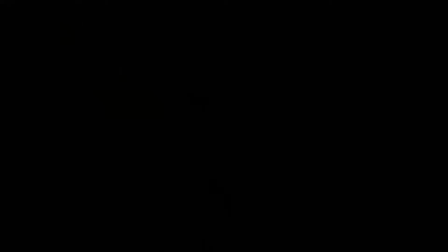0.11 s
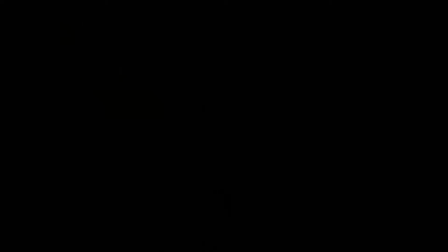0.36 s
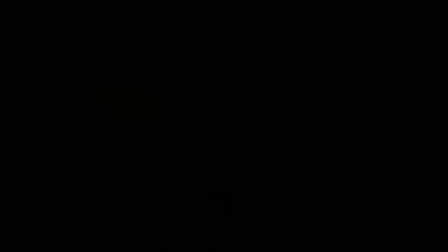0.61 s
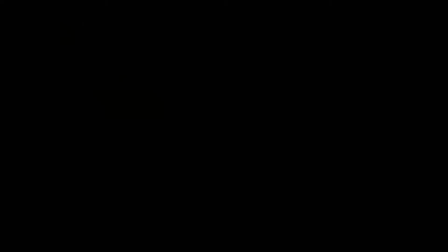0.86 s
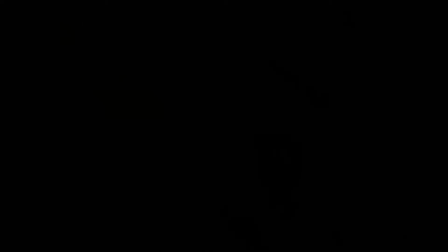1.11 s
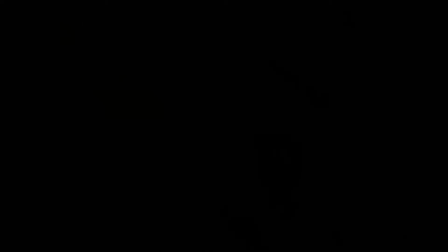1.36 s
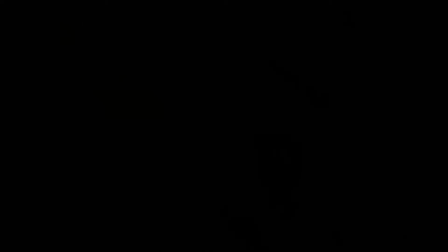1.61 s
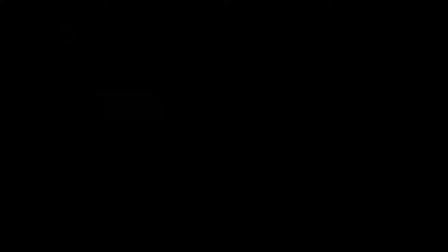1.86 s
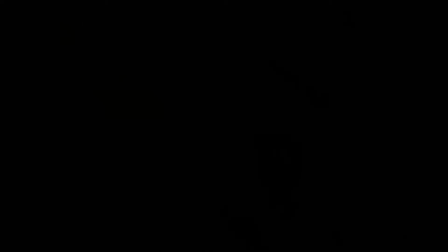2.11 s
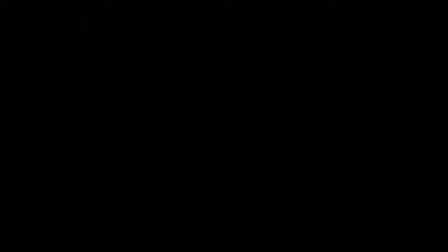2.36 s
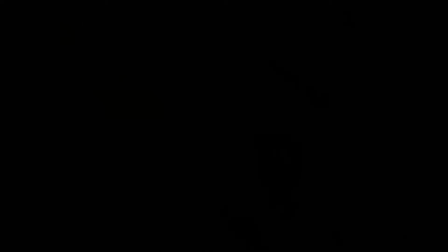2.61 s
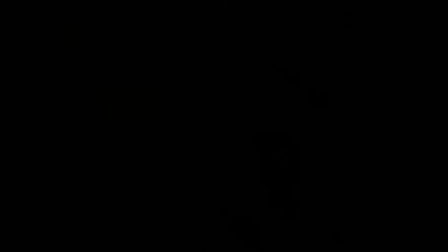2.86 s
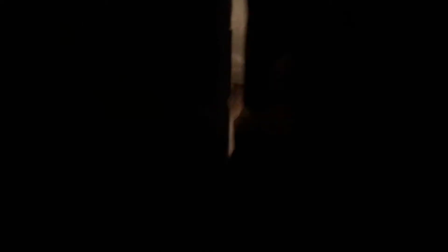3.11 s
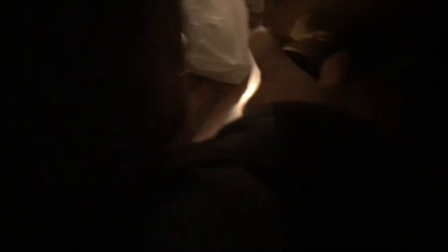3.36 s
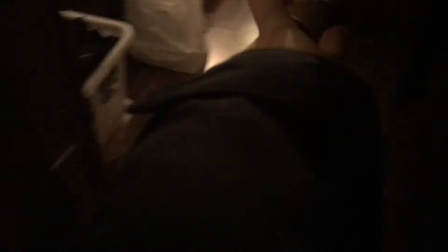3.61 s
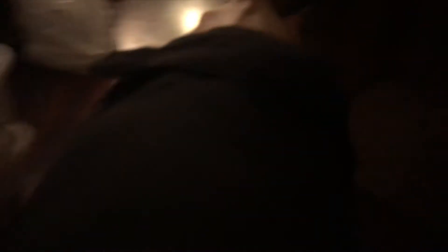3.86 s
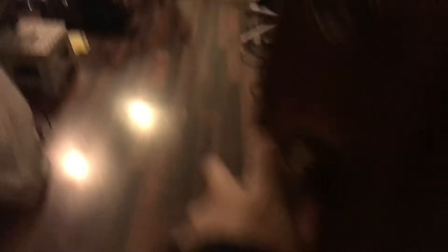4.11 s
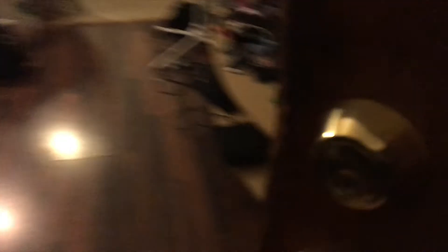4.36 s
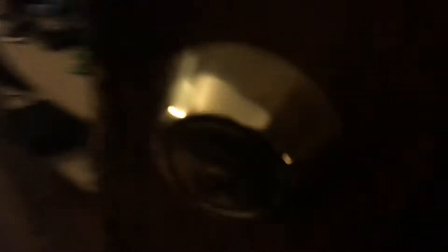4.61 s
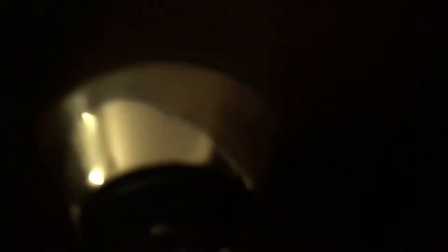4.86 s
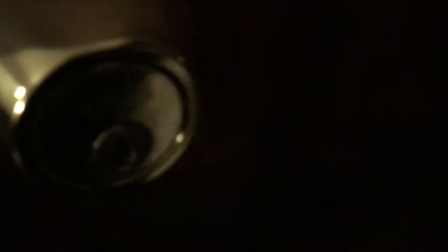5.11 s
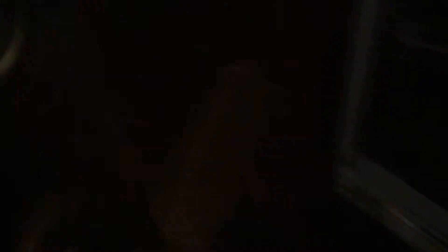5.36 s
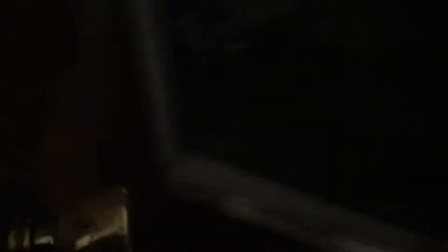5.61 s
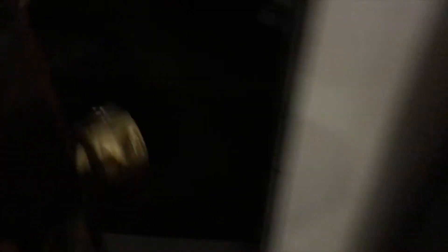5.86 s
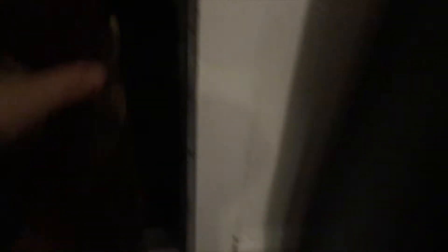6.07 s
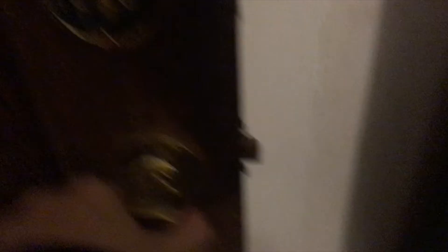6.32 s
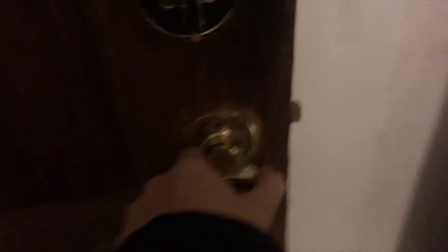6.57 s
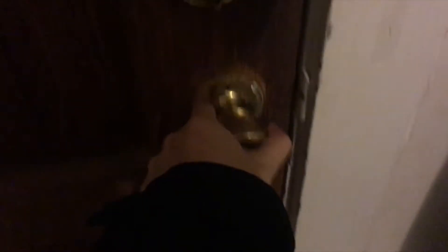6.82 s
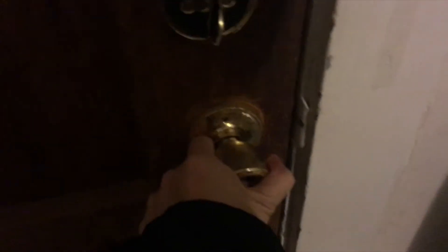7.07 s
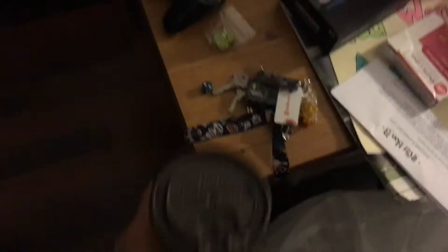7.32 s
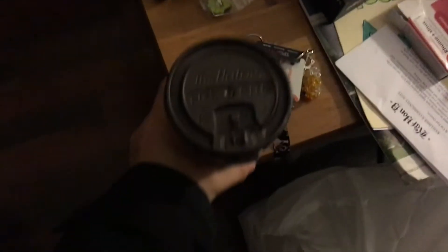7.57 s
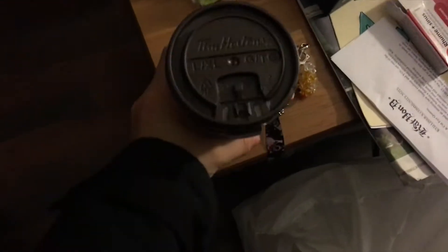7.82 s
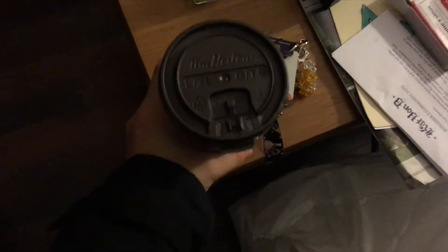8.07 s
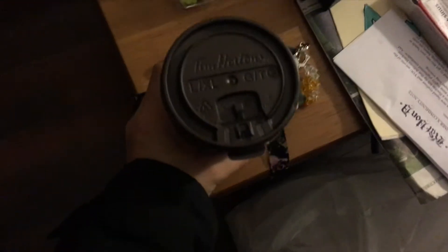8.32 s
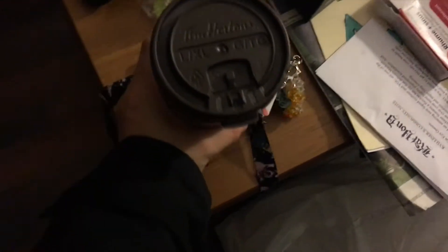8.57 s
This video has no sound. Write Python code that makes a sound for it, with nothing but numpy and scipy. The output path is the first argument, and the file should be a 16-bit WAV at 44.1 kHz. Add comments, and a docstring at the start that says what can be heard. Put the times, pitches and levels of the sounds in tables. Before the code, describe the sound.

Very close to a handheld microphone, keys jingle brightly and a lock snaps and rattles. A wooden door is knocked and opened with deep thuds, clacks and short metal squeaks, among cloth rub and bumpy handling rumble. After sparser clicks it slams with the loudest, booming thump in a short hall echo. The sound cuts to a nearly silent room with low hiss and hum, then tiny ticks and keys dragging grittily across a desk.

```python
"""Keys jingle, a lock clicks, a wooden door thumps and booms; then a jump to a quiet desk, where keys are dragged off.
A hand with a hand-held camera works the lock, opens the door, steps in and shuts it.
Clicks and thumps are bursts of noise and dying tones, keys are sets of ringing tones, squeaks are gliding noise.
Handling and the drag over the desk are grainy noise; a short hall echo, room hiss and a faint hum lie around them.
"""
import sys
import numpy as np
from scipy import signal
from scipy.fft import rfft, irfft, next_fast_len
from scipy.io import wavfile
from scipy.ndimage import uniform_filter1d

SR = 44100
rng = np.random.default_rng(int(sys.argv[2]) if len(sys.argv) > 2 else 0)


def gain_from_decibels(decibels):
    """Convert decibel values to linear amplitude factors."""
    exponent = np.asarray(decibels, float) / 20
    return 10 ** exponent


def dump(signal):
    """Clip the signal to [-1, 1] and save it as 16-bit WAV at the path in sys.argv[1]."""
    limited = np.clip(np.atleast_2d(signal).T, -1, 1)
    pcm = np.round(limited * 32767).astype(np.int16)
    wavfile.write(sys.argv[1], SR, pcm)


N = 383669  # length in samples

# Clicks of lock, latch and chain at the door, then four small clicks at the desk. Each row: start in seconds,
# nominal level in dB, wood below 1.2 kHz and fizz at the top, both in dB relative to the click,
# pitch of the part that is hit in Hz.
CLICK_EVENTS = [(0.0386, -33.5, -49, 7, 14000), (0.1087, -21, -29, -25, 9200), (0.176, -33, -23, -1, 15000),
                (0.2113, -26.5, -34, 11.5, 14700), (0.242, -29, -29, 17, 15300),
                (0.2648, -15.5, -26, 9, 14000), (0.2939, -13, -27, 8, 9400), (0.3185, -21.5, -25, -5, 5500),
                (0.387, -27.5, -12, -29, 1590), (0.4281, -26, -31, -9, 7140), (0.4435, -17, -18, 7.5, 5400),
                (0.558, -37, -13, -11, 1660), (0.5973, -26, -9, -6, 1630), (0.6265, -33.5, -21, 0, 1640),
                (0.6736, -39, -20, 6, 1640), (0.6903, -30.5, -17, -31, 1690), (0.7193, -38, -11, 3, 1720),
                (0.8651, -16, -10.5, -1.5, 1630), (0.978, -25, -16, 0, 3460),
                (0.9983, -25.5, -8, -18, 8900), (1.0504, -26.5, -25, -35, 9100),
                (1.0953, -24, -4, -2, 2580), (1.1133, 0, -16.5, -27, 1650), (1.1445, -7, -36, -30, 5200),
                (1.27, -22.5, -34, -1, 1530), (1.297, -31, -26, -20, 1550), (1.3893, -20.5, -36, -1, 1740),
                (1.4137, -46, -35, -22, 13900), (1.4426, -31.5, -28, -20, 1590),
                (1.496, -28, -18, -14, 1730), (1.6505, -27.5, -29, -3, 2300), (1.704, -22, 0.5, -2, 1530),
                (1.7225, -17, -10, -1, 1580), (1.8316, -29.5, -21, 6, 1710), (1.921, -5, -14, -3.5, 2370),
                (1.9685, -14.5, -19, -4, 1700), (1.9962, -14.5, -14, 0, 1650), (2.0418, -7, -18, 3, 1700),
                (2.149, -29, -17, -17, 3900), (2.2174, -36, -5, 7, 1800), (2.2675, -36, -26, -12, 3840),
                (2.3253, -37, -21, -12, 7900), (2.387, -36, -38, -1, 11400), (2.4174, -30.5, -45, 7, 2500),
                (2.5128, -39, -2.5, -14, 11400), (2.5368, -35, -20, 6, 6860), (2.5496, -34.5, -26, 7, 3940),
                (2.587, -29, -37, 5, 11300), (2.6095, -40, -32, -2, 11300), (2.6437, -32, -31, -1, 6700),
                (2.6713, -18.5, -12.5, -5, 5550), (2.7496, -45, -11, -10, 6800),
                (2.7653, -22, -18, -1, 1560), (2.7826, -17.5, -12.5, -10, 1840),
                (2.834, 1.5, -10, -1.5, 4650), (2.8826, -17, -29, -4, 2930), (2.9049, -14, -12.5, 0, 3100),
                (2.9951, -28, -9, -11, 2230), (3.3852, -21.5, -12, -8, 2330), (3.4154, -30, -26, -29, 2480),
                (3.6172, -26, 0, -12, 1770), (3.7576, -17, -6.5, -0.5, 1560), (4.2033, -27, -24, -13, 5360),
                (4.6195, -26.5, -6, -14, 7000), (4.6569, -13, -9.5, -2.5, 3480),
                (4.7139, -19.5, -6.5, -10, 2160), (4.7283, -23, -6.5, 0, 3480), (4.826, -34, -24, 6, 3900),
                (4.9057, -41, -24, -9, 6600), (4.9701, -29.5, -47, 11, 14600), (5.012, -26, -24, 4, 2370),
                (5.0539, -19.5, -10, 3.5, 1580), (5.1033, -32, -5, 12, 2300), (5.231, -28, -11, -1, 1680),
                (5.251, -33.5, -16, 6.5, 2320), (5.3797, -35.5, -32, 14.5, 2340),
                (5.6334, -43, -22, 8, 1580), (5.77, -29.5, -30, -18, 11300), (5.8038, -36, -30, 8, 11200),
                (5.8636, -40, -23, 5, 14000), (5.8905, -31, -32, 4.5, 1770), (5.9863, -27, -1, -4, 1670),
                (6.0791, -20, -6, -23, 2730), (6.2868, -16, -13, -36, 2570), (6.4747, -16, -32, -30, 1730),
                (6.5793, -27, -37, 1, 5660), (6.6811, -19, -6, 6, 1540), (6.7027, -12.5, -25, -36, 3710),
                (6.7755, -18.5, -11, -29, 5850), (6.832, -34, -16, -20, 1580),
                (6.8434, -33, -15, -22, 2750), (6.8547, -2.5, -26, -35, 2820), (6.8601, -6, -7, 8.5, 1706),
                (8.0275, -39.5, -31, -2, 2200), (8.0552, -37, -19, 1, 3620),
                (8.0681, -36.5, -25, 10.5, 4030), (8.1998, -42, -17, -24, 2410)]
# Thumps on door and floor boards, then three faint ones at the desk. Each row: start in seconds,
# nominal level in dB, brightness in dB per octave.
THUMP_EVENTS = [(0.131, -24.5, 4), (1.108, -32, 6.5), (1.264, -36, 4), (1.743, -8, 2), (1.92, -17, 4.5),
                (2.11, -30, 0), (2.511, -34, 5), (2.829, -20, 0.5), (3.34, -25.5, 8), (3.426, -24.5, -13),
                (3.558, -29.5, -2), (3.597, -19, -13.5), (3.702, -25, -3), (3.735, -17.5, 5),
                (3.758, -21.5, 4), (3.911, -41, -6), (4.031, -30, 19), (4.106, -23, -6),
                (4.307, -21.5, 16.5), (4.406, -33, -9), (4.524, -37.5, -9.5), (4.656, -24.5, 7),
                (4.728, -24, 2), (5.008, -32, -11), (5.217, -27, 6), (5.776, -44.5, 1), (5.906, -40, -16),
                (5.99, -37.5, -1), (6.073, -27, 7.5), (6.301, -25, 7.5), (6.404, -34.5, -14),
                (6.703, -16, 4.5), (6.769, -21.5, -9.5), (6.871, 3.5, 5.5), (8.197, -37.5, -1),
                (8.222, -40, -7), (8.26, -31.5, 2.5)]
# Tones of the door panel, used for every thump. Each row: pitch in Hz, level in dB, time to fall by 60 dB
# in seconds before each blow's own factor.
DOOR_MODES = [(77.7, 7, 0.17), (111, -17, 0.15), (171.4, -5, 0.58), (279, 6, 0.21), (364.7, -4, 0.42),
              (618, -3, 0.11), (970, 4, 0.023)]
# Tones of five keys, a to e, one list for each. Each row: pitch in Hz, level in dB, time to fall by 60 dB
# in seconds before each blow's own factor.
KEY_MODES = [
    [(4474, -25, .15), (5728, -12, .12), (6900, -14, .1), (7903, -15, .15), (9938, -5, .12),
     (11500, -8, .1), (13950, 0, .09), (14920, -8, .12)],
    [(5609, 0, .2), (7101, -14, .07), (8863, -15, .45), (8967, -10, .18)],
    [(9620, -3, .12), (10820, -2, .09), (11620, -4, .12), (12150, -4, .1), (12440, -6, .25),
     (12770, -2, .1), (13040, -5, .15), (15400, -2, .1)],
    [(3640, 0, .13), (4813, -4, .15), (5700, -10, .17), (9100, -14, .1), (12440, -14, .12),
     (12760, -9, .11)],
    [(4215, -14, .1), (6090, -14, .12), (6745, -6, .13), (9015, -18, .1), (10195, -6, .1), (11330, 0, .09),
     (14570, -4, .15)],
]
# Blows that set a key ringing. Each row: start in seconds, key a to e, level in dB before the flutter,
# brightness in dB per octave, factor on the ring time.
KEY_BLOWS = [(.0368, "a", -18, 22, .83), (.1136, "a", -29, -4.5, .8), (.1396, "a", -23, -10.5, .68),
             (.2099, "a", -12.5, 27, .37), (.2409, "b", -26, 6, .39), (.2409, "c", -15, -7, .7),
             (.2648, "a", -39, 4, .8), (.2824, "a", -18.5, -6, .4), (.4289, "a", -22, -14.5, .5),
             (.4344, "b", -26, 16, .43), (.9974, "b", -34.5, 15.5, .84), (.9986, "c", -32, -3, .9),
             (1.1443, "b", -18, -8.5, .89), (1.1697, "c", -24.5, 0, .72), (2.2807, "e", -39.5, -1, .7),
             (2.3855, "e", -37, 3, .38), (2.4179, "e", -31, 3, .3), (2.5137, "e", -36.5, -7, .45),
             (2.588, "e", -32.5, -19, .26), (2.6115, "e", -34.5, -6, .9), (2.6713, "e", -31, -5.5, .76),
             (4.6199, "b", -36, -3, .34), (4.708, "e", -38, 14, 1.5), (4.6568, "d", -23, -3, .75),
             (4.7287, "d", -24, -8, .65), (4.8733, "e", -40.5, -2, .76), (4.9686, "e", -24, 3, .99),
             (5.012, "e", -25, -5, 0.27), (5.0539, "e", -29, 0, 0.43), (5.7698, "e", -31.5, -13.5, .31),
             (5.8042, "e", -31, 10, .42), (6.2871, "b", -32, 17, .69), (6.2871, "c", -12.5, 4, 0.42),
             (6.2876, "d", -39, 37, 1.), (6.4747, "d", -56, -7.5, 1.)]
# Metal slipping on metal. Each row: start in seconds, length in seconds, first pitch in Hz, last pitch in Hz,
# width of each of two resonances in Hz, level in dB.
METAL_SQUEAKS = [(.9, .03, 9500, 9800, 80, -42), (1.378, .016, 14500, 14000, 900, -32),
                 (1.395, .012, 14200, 14000, 700, -30), (1.41, .02, 14200, 14000, 800, -29),
                 (2.882, .012, 11800, 12100, 300, -36), (2.9, .017, 2700, 3500, 200, -22),
                 (3.17, .05, 12600, 11500, 90, -56), (3.215, .035, 11600, 10900, 90, -46),
                 (3.21, .035, 9800, 9550, 90, -52), (3.18, .15, 1400, 1350, 90, -55),
                 (3.18, .15, 1950, 1860, 80, -53), (3.18, .16, 2420, 2370, 90, -55),
                 (3.37, .07, 1250, 1230, 70, -48), (6.77, .014, 6000, 6300, 300, -33),
                 (6.9, .45, 3250, 3250, 1.5, -65)]
# Hand, sleeve and steps at the door. Each row: time in seconds, rumble in dB, rub in dB, scrape in dB.
HANDLING_CURVE = [(0.0, -51, -55.5, -63), (0.34, -62, -57, -43.5), (0.68, -51, -70.5, -72),
                  (0.92, -57, -47, -56), (1.04, -59, -56.5, -53.5), (1.58, -53, -46, -53),
                  (1.78, -52, -57, -45.5), (1.92, -54, -57, -67), (2.06, -36, -49, -46),
                  (2.26, -47, -61, -57), (2.54, -63.5, -69.5, -57.5), (2.84, -48, -47.5, -47),
                  (3.04, -49.5, -54.5, -53.5), (3.4, -63, -50, -53), (3.6, -32, -55, -62),
                  (3.8, -66, -56, -56), (4.1, -50, -60, -59), (4.24, -58.5, -52, -56),
                  (4.69, -42, -50, -54.5), (5.04, -56.5, -56.5, -50.5), (5.51, -54.5, -62, -62.5),
                  (5.95, -40, -64, -57.5), (6.21, -54, -53.5, -53.5), (6.57, -49.5, -58, -63),
                  (6.73, -45, -58, -60), (6.87, -40, -48, -63), (7.03, -37.5, -56.5, -68.5),
                  (7.19, -50, -59, -66.5)]
# Tone colour of the cloth rub. Each row: frequency in Hz, relative level in dB per Hz.
RUB_COLOUR = [(70, -36), (130, 2.5), (340, -1.5), (650, -8), (1000, -6.5), (2200, -15.5), (5000, -31),
              (16000, -56)]
# Tone colour of the scrape. Each row: frequency in Hz, relative level in dB per Hz.
SCRAPE_COLOUR = [(590, -29.5), (1000, 0), (1420, -5.5), (1910, -4.5), (3300, -10.5), (5830, -13.5),
                 (10700, -18.5), (14400, -20.5), (16000, -16)]
# Resonances of desk top and keys under the drag. Each row: pitch in Hz, width in Hz, relative level in dB.
DRAG_RESONANCES = [(360, 206, 9.5), (1270, 65, 0.5), (1850, 69, 5), (3620, 120, -1.5), (4200, 96, -6.5),
                   (5920, 830, -2.5), (11300, 35, -22), (14000, 43, -17.5), (15000, 160, -34)]
# Strength of the drag over time. Each row: time in seconds, level in dB.
DRAG_CURVE = [(8.018, -55.5), (8.101, -71), (8.16, -61.5), (8.22, -64.5), (8.3, -54.5), (8.38, -47.5),
              (8.53, -43.5), (8.62, -45.5), (8.7, -48.5)]
# Tone colour of the room hiss. Each row: frequency in Hz, relative level in dB per Hz.
AIR_COLOUR = [(41, -46), (70, -1), (115, -21.5), (135, -8), (204, -13.5), (256, -5.5), (300, -12.5),
              (336, -6), (368, -15.5), (664, -12.5), (16000, -41.5)]
# How fast the echo dies away. Each row: frequency in Hz, time to fall by 60 dB in seconds.
HALL_DECAY = [(200, 0.29), (1000, 0.21), (4000, 0.1), (12000, 0.049)]
# Where the bands of scrape grains lie: a list of frequencies in Hz.
GRAIN_BANDS_HZ = [1300, 1900, 2700, 3900, 5600, 8000, 11500, 14500]
# The whole door leaf swinging at its lowest tone. Each row: start in seconds, nominal level in dB,
# time to fall by 60 dB in seconds.
DOOR_BOOMS = [(1.744, -21, 0.6), (1.923, -18.5, 1.06), (2.108, -38, 3.6), (2.84, -37, 0.65),
              (3.43, -36, 0.6), (3.518, -29, 0.3), (3.702, -25, 0.23), (4.063, -31, 0.55),
              (5.011, -41, 0.98), (6.401, -37, 0.53), (6.707, -26, 0.72), (6.872, -10.5, 0.4),
              (7.088, -28.5, 1.7)]

JUMP_S = 7.197  # the door ends and the desk begins
BOOM_HZ = 43.47
AIR_DB, HUM_HZ, HUM_DB = -60, 53, -62
CLICK_T60_S, CLICK_T60_DB_PER_DB = 0.021, -0.0275  # rattle of a -23.5 dB click; harder ones are a little shorter
PART_WIDTH = 0.085  # width of the part's ring as a share of its pitch
PART_DB, PART_DB_PER_DB = -21, 0.86  # gain of the part's ring for a -25.5 dB click; hard clicks drown it
THUMP_RING, THUMP_RING_DB_PER_DB = 0.42, -0.12  # ring factor of a -27.5 dB blow; hard blows ring shorter
TOUCHES_PER_S, TOUCH_SPREAD_DB = 4.7, 4.5  # rate for each key
TOUCH_RING, TOUCH_T60_S, TOUCH_DB = 0.12, 0.0055, -4  # ring factor, noise fall time, gain over the scrape curve
RUMBLE_BY_THUMP_DB, RUB_BY_THUMP_DB, RUB_BY_WOOD_DB, SCRAPE_BY_CLICK_DB = -19, -27, -23.5, -28.5
SHAKE_RISE_S, SHAKE_T60_S = 0.002, 0.29  # every blow jolts hand and camera, and the jolt dies away
RUB_GRAIN_SPREAD_DB, SCRAPE_SMOOTH = 3, 1.8  # the second is the hiss under the scrape grains
EDGE_HZ, CEILING = 15900, 0.75  # treble limit and overload level of the camera


def keys():
    """Each key rings at its own tones; neighbours touch it, so the ring flutters and small ticks fall between."""
    rings, touches = np.zeros((2, N))
    t = np.arange(SR // 50) / SR
    for (s, key, db, tilt_db, stretch), luck in zip(KEY_BLOWS, rng.standard_normal((len(KEY_BLOWS), 12))):
        modes = KEY_MODES["abcde".index(key)]
        add(rings, s, gain_from_decibels(db) * ring(modes, luck, 1.2, np.clip(stretch, 0.15, 2), tilt_db))
    for modes in 4 * KEY_MODES:  # four different ticks for each key
        hits = rng.random(N) < TOUCHES_PER_S / 4 / SR
        sizes = gain_from_decibels(TOUCH_SPREAD_DB * np.minimum(rng.exponential(1, N), 4)) * hits
        tick = np.diff(rng.standard_normal(len(t) + 1)) * gain_from_decibels(-60 * t / TOUCH_T60_S)
        add(tick, 0, gain_from_decibels(-8.5) * ring(modes, rng.standard_normal(12), 8.4, TOUCH_RING, detune=0.045))
        touches += signal.oaconvolve(sizes, tick)[:N]
    rings *= gain_from_decibels(2.5 * slow_wander(300))  # flutter
    return rings + gain_from_decibels(TOUCH_DB) * handled(column=2) * touches


def clicks():
    """A crack and a rattling burst feed the wood, the solid body, the top fizz and the small part that is hit."""
    wood, body, fizz, part = np.zeros((4, N))
    t = np.arange(SR // 10) / SR
    draws = rng.standard_normal((len(CLICK_EVENTS), 2, len(t)))
    for (s, db, wood_db, fizz_db, hz), draw in zip(CLICK_EVENTS, draws):
        t60 = CLICK_T60_S * gain_from_decibels(CLICK_T60_DB_PER_DB * (db + 23.5))
        rattle = gain_from_decibels(4.11 * unit_rms(uniform_filter1d(draw[1], 50)))  # the contact chatters
        noise = draw[0] * (1 - np.exp(-t / 0.0012))
        burst = noise * (0.86 * gain_from_decibels(-60 * t / 0.009) + rattle * gain_from_decibels(-60 * t / t60))
        burst[30] += 4  # the first hard touch
        add(wood, s, gain_from_decibels(db + wood_db - 11) * noise * gain_from_decibels(-60 * t / (5.6 * t60)))  # wood rings on longer
        add(body, s, gain_from_decibels(db - 11) * burst)
        add(fizz, s, gain_from_decibels(db + fizz_db - 15) * burst)
        broad = resonate(resonate(burst, hz, 0.8 * hz), hz, 0.8 * hz)  # the part colours its own click
        narrow = resonate(burst, hz, PART_WIDTH * hz)
        add(part, s, gain_from_decibels(db - 23) * broad + gain_from_decibels(PART_DB + PART_DB_PER_DB * (db + 25.5)) * narrow)
    return band(wood, 300, 1200) + band(body, 950, 4500) + band(fizz, 5900, 13000) + part


def thumps():
    """Soft blows on wood start a set of dying panel tones, each with a dull puff of noise."""
    panel, puffs = np.zeros((2, N))
    t = np.arange(SR // 3) / SR
    push = signal.windows.hann(70)  # a soft contact dulls the start
    push /= push.sum()
    for (s, db, tilt_db), luck in zip(THUMP_EVENTS, rng.standard_normal((len(THUMP_EVENTS), 8))):
        stretch = THUMP_RING * gain_from_decibels(THUMP_RING_DB_PER_DB * (db + 27.5))
        blow = ring(DOOR_MODES, luck, 4.2, stretch, tilt_db, detune=0.036)
        add(panel, s, gain_from_decibels(db) * np.convolve(blow, push))
        add(puffs, s, gain_from_decibels(db - 13.5 - 60 * t / (0.18 * stretch)) * (1 - np.exp(-t / 0.0011)))
    return panel + band(puffs * rng.standard_normal(N), 47, 900)


def booms():
    """The door leaf swings as a slowly dying sine, with a little of its octave."""
    out, t = np.zeros(N), np.arange(SR) / SR
    turn = 2 * np.pi * BOOM_HZ * t
    swing = np.sin(turn) + 0.12 * np.sin(2 * turn)
    for s, db, t60 in DOOR_BOOMS:
        add(out, s, gain_from_decibels(db - 60 * t / t60) * (1 - np.exp(-t / 0.006)) * swing)
    return out


def squeaks():
    """Metal sticks and slips: noise through a narrow gliding resonance gives short whistles."""
    out = np.zeros(N)
    for s, length, first_hz, last_hz, width, db in METAL_SQUEAKS:
        size = round(length * SR)
        hz = np.r_[np.full(SR // 2, first_hz), np.linspace(first_hz, last_hz, size)]  # settles first
        noise = rng.standard_normal(SR)[:len(hz)]
        whistle = resonate(resonate(noise, hz, width), hz, width)[-size:]
        add(out, s, gain_from_decibels(db) * unit_rms(whistle) * signal.windows.tukey(size, 0.6))
    return out


def handling():
    """Lumpy rumble through the camera body, cloth rub and a gritty scrape, all stirred up by the blows."""
    click_s, click_db, wood_db = np.transpose(CLICK_EVENTS)[:3]
    thump_s, thump_db = np.transpose(THUMP_EVENTS)[:2]
    thumped = shaken(thump_s, thump_db)
    clicked = shaken(click_s, click_db)
    knocked = shaken(click_s, click_db + wood_db)
    clumps = gain_from_decibels(3.05 * slow_wander(500))  # stick and slip
    rumble = unit_rms(band(band(rng.standard_normal(N), 38, 110), 28, 160))
    rub = coloured(gritty(200, RUB_GRAIN_SPREAD_DB, 2.05), RUB_COLOUR)
    grains = np.zeros(N)
    for hz in GRAIN_BANDS_HZ:
        grains += band(gritty(39, 2.8, SCRAPE_SMOOTH), 0.94 * hz, 1.265 * hz) * np.sqrt(hz)
    rumble *= handled(column=0) + gain_from_decibels(RUMBLE_BY_THUMP_DB) * thumped
    rub *= clumps * handled(column=1) + gain_from_decibels(RUB_BY_THUMP_DB) * thumped + gain_from_decibels(RUB_BY_WOOD_DB) * knocked
    scrape = coloured(grains, SCRAPE_COLOUR) * clumps * handled(column=2)
    jolted = coloured(rng.standard_normal(N), SCRAPE_COLOUR) * gain_from_decibels(SCRAPE_BY_CLICK_DB) * clicked
    return rumble + rub + scrape + jolted


def drag():
    """Keys slide over the desk: dense grit, partly through the resonances of desk top and keys."""
    s, db = np.transpose(DRAG_CURVE)
    grit = gritty(900, 1.3, 1)[:SR]
    resonant = sum(gain_from_decibels(level_db) * resonate(grit, hz, width) for hz, width, level_db in DRAG_RESONANCES)
    sound = unit_rms(resonant) + 0.9 * coloured(grit, SCRAPE_COLOUR)
    level = gain_from_decibels(np.interp(s[0] + np.arange(len(grit)) / SR, s, db))
    out = np.zeros(N)
    add(out, s[0], level * sound)
    return out


def hall(x):
    """The room answers with sparse echoes of random sign, each frequency dying at its own speed."""
    taps = np.zeros(SR // 2)
    at = np.arange(100, len(taps) - 20, 20)
    taps[at + rng.integers(0, 20, len(at))] = rng.choice([-1.0, 1.0], len(at))
    hz, t, z = signal.stft(taps, SR, nperseg=256)
    fade = gain_from_decibels(-60 * t / read(HALL_DECAY, hz)[:, None])
    tail = signal.istft(z * fade, SR, nperseg=256)[1]
    return signal.oaconvolve(x, tail / np.linalg.norm(tail))[:N]


def air():
    """Coloured noise is the room hiss, settling after the jump; a narrow resonance makes a faint low hum."""
    hum = unit_rms(resonate(rng.standard_normal(N), HUM_HZ, 1.7))
    settle_db = 4.2 * np.exp(-np.maximum(np.arange(N) / SR - JUMP_S, 0) / 0.55)
    hiss = coloured(rng.standard_normal(N), AIR_COLOUR)
    return gain_from_decibels(AIR_DB + settle_db) * hiss + gain_from_decibels(HUM_DB) * hum


def handled(column):
    """One column of the handling curve as a gain, next to silent after its last row."""
    s, *columns = np.transpose(HANDLING_CURVE)
    return gain_from_decibels(np.interp(np.arange(N) / SR, s, columns[column], right=-120))


def shaken(times, levels_db):
    """Gain of the jolts after a set of blows; their powers add."""
    power, t = np.zeros(N), np.arange(SR // 2) / SR
    for s, db in zip(times, levels_db):
        jolt = gain_from_decibels(db - 60 * t / SHAKE_T60_S) * (1 - np.exp(-t / SHAKE_RISE_S))
        add(power, s, jolt ** 2)
    return np.sqrt(power)


def ring(modes, luck, spread_db, stretch, tilt_db=0, detune=0):
    """One blow makes a set of tones die away; luck changes their mix with where it lands. Peak 1."""
    hz, db, t60 = np.transpose(modes)[:, :, None]
    t = np.arange(round(SR * min(0.5, stretch * t60.max()))) / SR
    luck = luck[:len(modes), None]
    db = db + spread_db * luck + tilt_db * np.log2(hz / hz.mean())
    tones = np.sin(2 * np.pi * hz * (1 + detune * luck[::-1]) * t)
    sound = (gain_from_decibels(db - 60 * t / (t60 * stretch)) * tones).sum(0)
    return sound / abs(sound).max()


def resonate(x, hz, width):
    """A resonance of gain 1: shifts hz down to zero, smooths, and shifts back."""
    turn = np.exp(2j * np.pi * np.cumsum(hz * np.ones(len(x))) / SR)
    r = np.exp(-np.pi * width / SR)
    return 2 * (turn * signal.lfilter([1 - r], [1, -r], x / turn)).real


def gritty(per_s, spread_db, smooth):
    """Smooth noise mixed with sparse grains, a few of them large."""
    sizes = gain_from_decibels(spread_db * np.minimum(rng.exponential(1, N), 4))
    grains = sizes * (rng.random(N) < per_s / SR) * rng.choice([-1, 1], N)
    return unit_rms(grains) + smooth * rng.standard_normal(N)


def slow_wander(size):
    """Noise averaged twice over size samples, at rms 1."""
    return unit_rms(uniform_filter1d(uniform_filter1d(rng.standard_normal(N), size), size))


def band(x, lo_hz, hi_hz):
    """Band-pass that keeps white noise at about the same rms."""
    sos = signal.butter(2, [lo_hz, hi_hz], "bandpass", fs=SR, output="sos")
    return signal.sosfilt(sos, x) * np.sqrt(SR / 2 / (hi_hz - lo_hz))


def coloured(x, points):
    """Filters x by the tone colour in a table, to rms 1."""
    size = next_fast_len(len(x))
    gain = gain_from_decibels(read(points, np.fft.rfftfreq(size, 1 / SR)))
    return unit_rms(irfft(rfft(x, size) * gain, size)[:len(x)])


def read(points, hz):
    """Reads a table between its rows, along a logarithmic frequency axis."""
    f, value = np.transpose(points)
    return np.interp(np.log(hz + 1), np.log(f + 1), value)


def unit_rms(x):
    """Scales to rms 1."""
    return x / np.sqrt(np.mean(x ** 2) + 1e-20)


def add(mix, s, sound):
    """Mixes a sound in at s seconds."""
    part = mix[max(round(s * SR), 0):][:len(sound)]
    part += sound[:len(part)]


def scene():
    """Blows ring in the hall until the jump to the desk cuts them off; small ones follow at the desk."""
    blows = keys() + clicks() + thumps()
    at_door = np.arange(N) < JUMP_S * SR
    at_desk = np.arange(N) > (JUMP_S + 0.6) * SR
    door, desk = blows * at_door, blows * at_desk
    door = (door + gain_from_decibels(-8) * hall(door) + booms() + squeaks() + handling()) * at_door
    desk = desk + gain_from_decibels(-16) * hall(desk)
    return (door + desk + drag() + air())[None]


def band_limit(x):
    """A steep low-pass at the top of the band."""
    return signal.sosfilt(signal.butter(12, 16970, fs=SR, output="sos"), x)


def record(dry):
    """Low cut, soft overload and treble limit of the camera."""
    low_cut = signal.butter(3, 35, "highpass", fs=SR, output="sos")
    x = signal.sosfilt(low_cut, dry)
    x = x / (1 + (abs(x) / CEILING) ** 4) ** (1 / 4)  # peaks bend towards the ceiling
    treble_limit = signal.firwin(255, EDGE_HZ, window=("kaiser", 6), fs=SR)
    mix = signal.oaconvolve(x, treble_limit[None], "same")
    return band_limit(mix)


dry = scene()
out = record(dry)
dump(out)
```